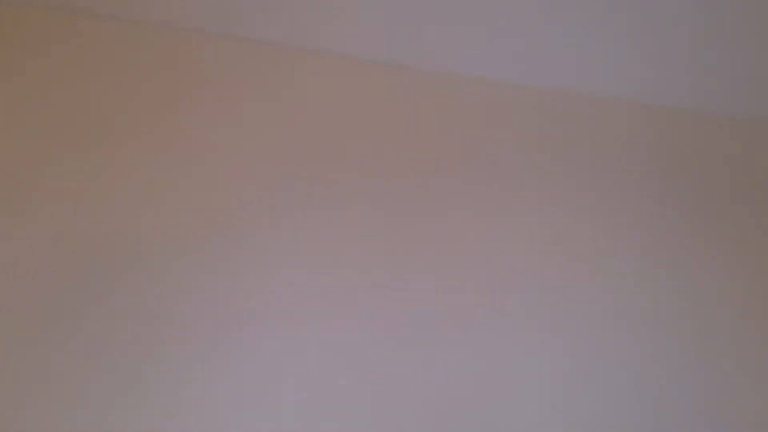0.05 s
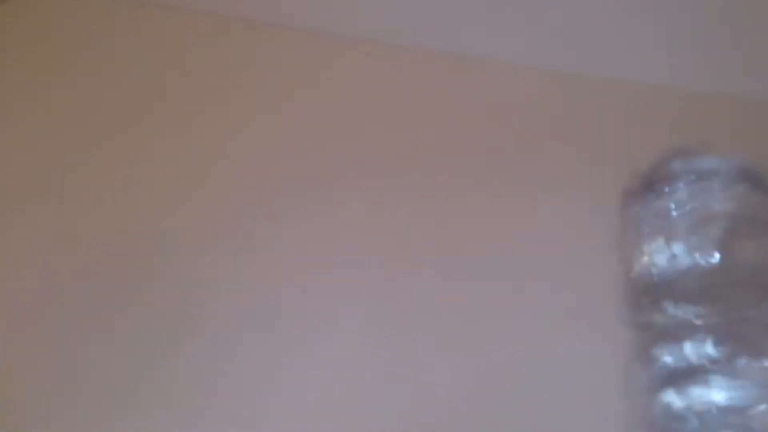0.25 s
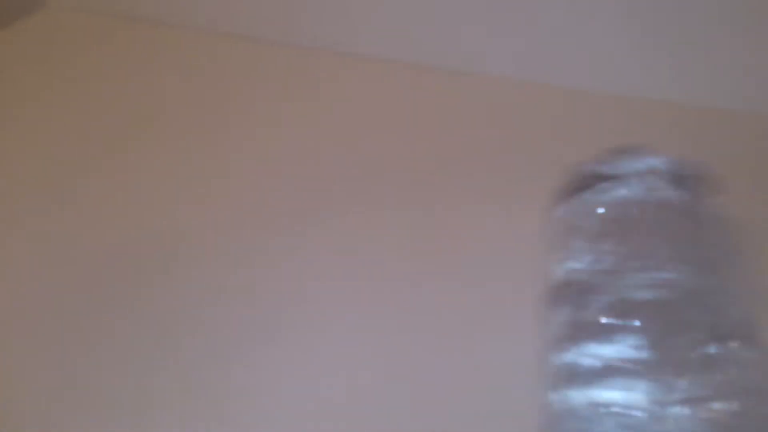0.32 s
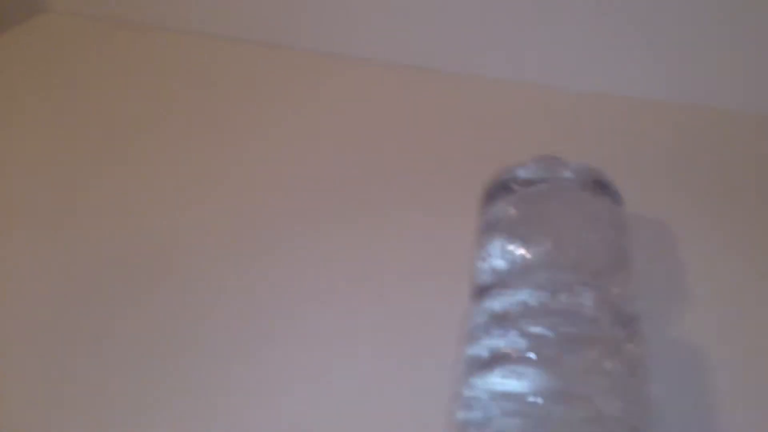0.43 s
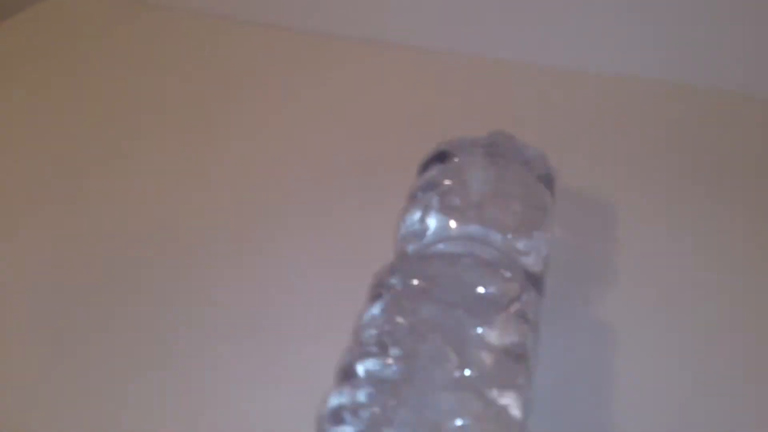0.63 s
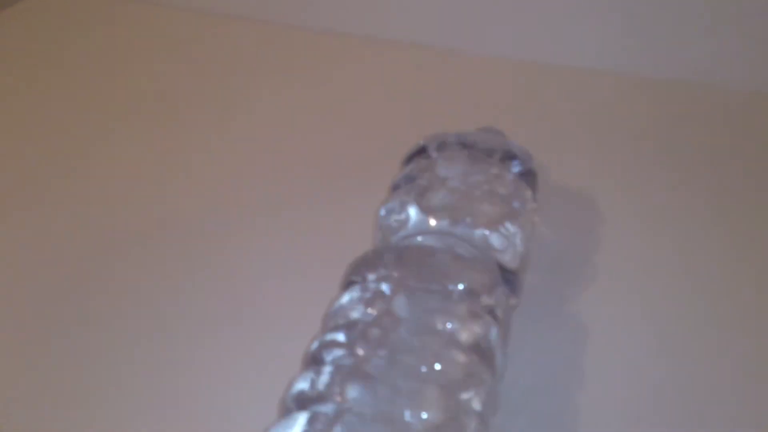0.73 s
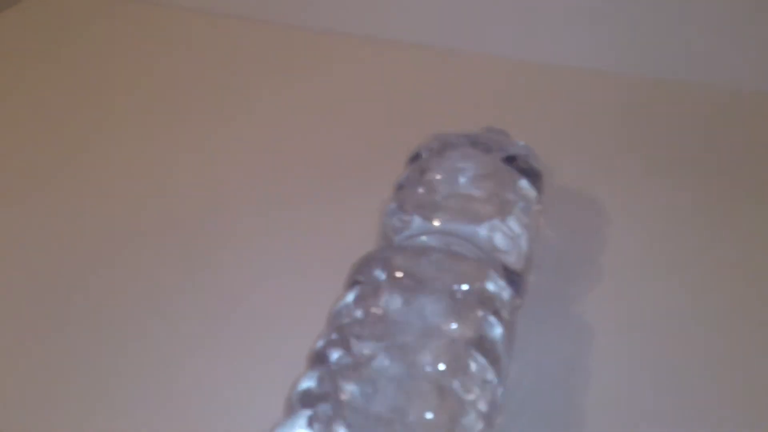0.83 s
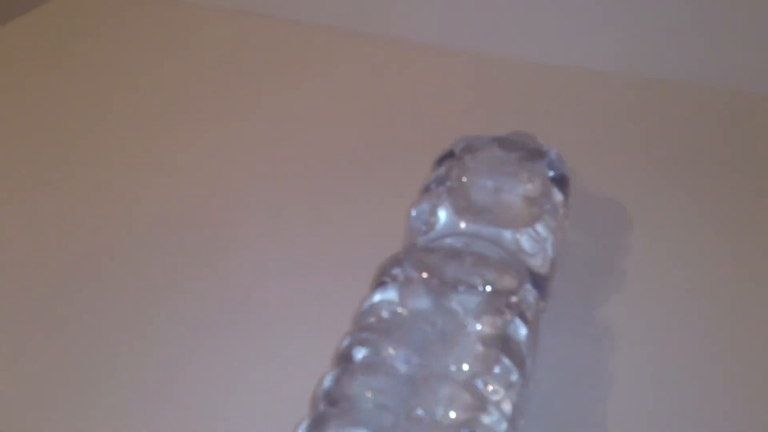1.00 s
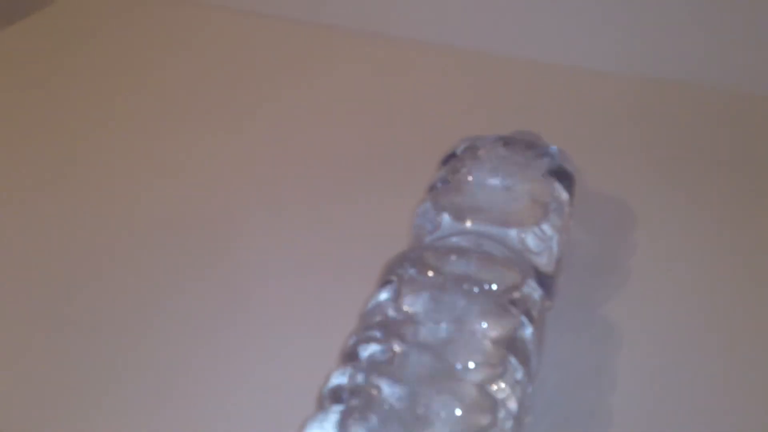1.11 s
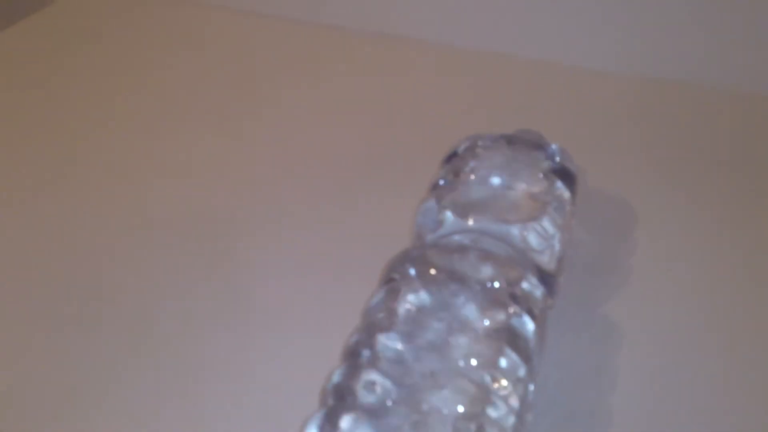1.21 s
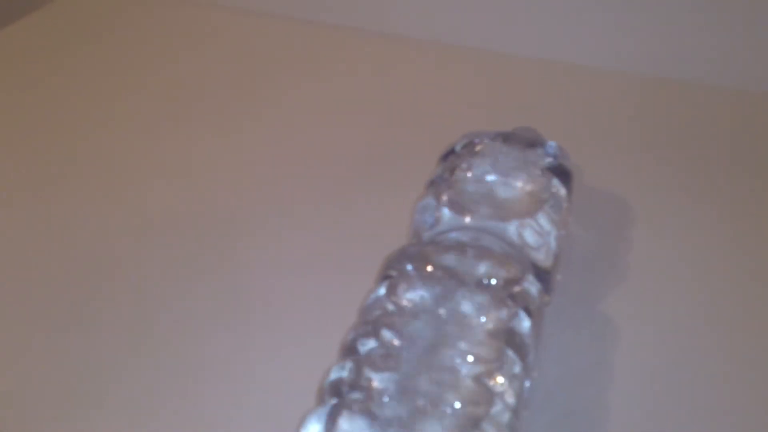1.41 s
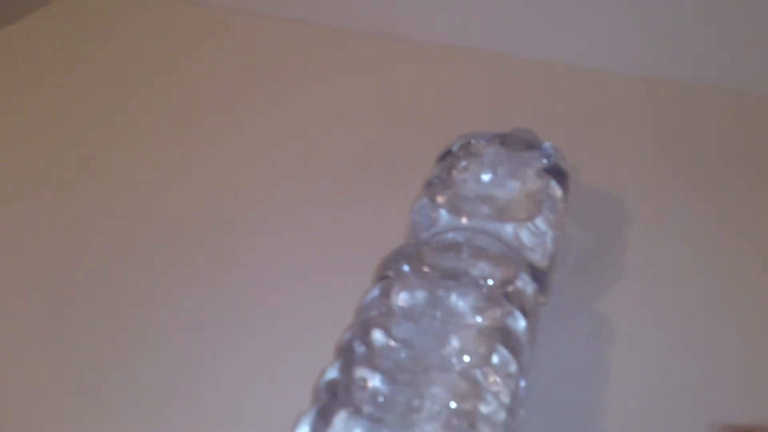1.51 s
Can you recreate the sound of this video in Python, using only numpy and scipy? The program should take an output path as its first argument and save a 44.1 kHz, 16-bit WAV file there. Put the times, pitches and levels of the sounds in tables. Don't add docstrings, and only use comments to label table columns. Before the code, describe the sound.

A ribbed plastic bottle drops on a hollow hard panel, crackles, bounces and rolls to rest

```python
import sys
import numpy as np
from scipy import signal
from scipy.fft import rfft, irfft
from scipy.io import wavfile
from scipy.ndimage import uniform_filter1d

SR = 44100
rng = np.random.default_rng(int(sys.argv[2]) if len(sys.argv) > 2 else 0)


def master_out(mix):
    frames = np.transpose(np.atleast_2d(mix))
    ceiling = np.clip(frames, -1, 1)
    pcm = np.round(ceiling * 32767).astype(np.int16)
    wavfile.write(sys.argv[1], SR, pcm)


def natural_amplitude(level_db):
    exponent = np.asarray(level_db, float) / 20
    return 10 ** exponent


N = 68355

# (frequency [Hz], level [dB])
HISS = [(15, -52.5), (25, -17), (99, 0.5), (260, -4.5), (290, -3.5), (497, -7.5), (948, -12), (1460, -16.5),
        (15600, -25.5)]
# (time [s], level [dB],
# frequency [Hz], decay [cycles])
TICKS = [(0.117, -53.5, 1620, 24), (0.1577, -39.5, 1500, 14), (0.1578, -41.5, 3700, 16),
         (.1695, -33.5, 1787, 28), (.185, -47, 1650, 20), (.2441, -11.5, 10600, 22), (.2439, -8, 13200, 16),
         (0.227, -15, 5260, 8), (.9068, -32, 1076, 40), (.9062, -35, 3314, 20), (.9755, -48, 3260, 30),
         (.2013, -20.5, 710, 4.8), (.2078, -17, 1920, 3.6), (.2150, -16.5, 800, 8),
         (.2250, -9.5, 1590, 9.2), (.2290, -17, 3800, 6.3), (.2325, -16, 2530, 4.8),
         (.2465, -16, 1960, 6.4), (.2730, -19.5, 900, 5), (.2810, -16.5, 664, 10),
         (.3355, -26.5, 4190, 9.1), (.3400, -7.5, 906, 7.2), (.3435, -18, 5170, 10), (.3465, -21.5, 760, 8),
         (.3575, -13, 1040, 7.4), (.3610, -19.5, 2775, 6), (.3695, -19.5, 2420, 4.7),
         (.3790, -14.5, 1500, 14), (.3900, -27, 2360, 6), (.4075, -23, 2000, 3.6), (.4360, -14.5, 4520, 16),
         (.4370, -18.5, 1314, 23), (.4500, -19.5, 478, 10), (.4630, -12.5, 3400, 14), (.4640, -25, 480, 10),
         (.4760, -18, 1080, 6.9), (.4985, -18, 2860, 6), (.5120, -32, 2200, 7.5), (.5220, -7.5, 464, 6.5),
         (.5360, -25, 3300, 17), (.5630, -22.5, 3600, 21), (.5860, -31, 3370, 18), (.5965, -20.5, 636, 10),
         (.6170, -19, 3140, 7.9), (.6210, -24, 910, 6.2), (.6790, -27.5, 598, 6), (.7840, -40, 1065, 20)]
# (time [s], level [dB], 60 dB decay [s], brightness [dB/octave], pitch [ratio])
FINGERS = [
    (0.118, -62.5, 0.021, 1.5, .92),
    (0.13, -63.5, 0.04, -0.5, 1),
    (0.1584, -49.5, 0.022, 2.5, 1.12),
    (0.1696, -43, 0.028, -3, 1.02),
    (0.174, -48.5, .03, 4, 0.89),
    (0.184, -50.5, 0.054, -1, 0.82),
]
# (frequency [Hz], width [Hz], level [dB])
FINGER_MODES = [(480, 150, -7.5), (930, 200, -8), (1760, 120, -3.5), (3700, 900, -12.5), (5700, 830, -21.5),
                (7550, 1600, -14.5), (10500, 2400, -13.5)]
# (frequency [Hz], level [dB])
ROOM_COLOUR = [(60, -7.5), (250, -2), (1000, -4), (4000, -2.5), (12000, -4)]
# (frequency [Hz], 60 dB decay [s])
ROOM_T60 = [(150, 0.3), (500, 0.64), (2000, 0.5), (6000, 0.41), (12000, 0.71)]
# (time [s], level [dB], brightness [dB/octave], 60 dB decay [s])
BLOWS = [(0.195, -50.5, -1, 0.044), (0.2001, -21.5, 0.5, 0.33), (.208, -13.5, -3, 0.056),
         (.225, -11, 0, 0.097), (0.234, -21, 3.5, 0.06), (0.246, -11, 2, 0.018), (.340, -16.5, -0.5, 0.1),
         (0.259, -23, -0.5, 0.047), (0.267, -21, 5, 0.15), (.335, -13.5, -1.5, 0.09),
         (0.347, -17, -1.5, 0.029), (.358, -14, -1.5, 0.071), (.369, -22.5, -2.5, 0.05),
         (0.428, -19.5, -1.5, 0.17), (.436, -15.5, 0, 0.054), (0.459, -22, 2, 0.093), (.498, -19, -1, 0.1),
         (.563, -30.5, 4, 0.09), (0.598, -27, 1.5, 0.012), (0.516, -26, -6.5, 0.11),
         (.7815, -39, -3, 0.084)]
# (frequency [Hz], level [dB])
CREASE_COLOUR = [(180, -45.5), (300, -11), (468, -8.5), (571, -15.5), (953, -10.5), (1220, -16),
                 (6680, -23.5), (10300, -19.5), (15500, -39.5)]
# (time [s], level [dB])
ROLL_FORCE = [(.196, -94.5), (.201, -45), (0.211, -23.5), (.3, -24.5), (0.332, -26), (.37, -18.5),
              (0.421, -20), (0.549, -23.5), (.65, -28.5), (0.751, -37), (0.852, -46.5), (.95, -45.5),
              (1.051, -53.5), (1.15, -65), (1.3, -83.5)]
# (frequency [Hz], width [Hz], level [dB])
PANEL = [(62, 18, -3.5), (85, 3, 2.5), (118.8, 14, -1), (180, 36, -0.5), (261.6, 6.7, -4.5), (280, 4.7, -1),
         (345, 120, -11), (494, 20, -12), (625, 48, -15.5), (800, 80, -25)]
# (frequency [Hz], width [Hz], level [dB])
SHELL = [(1055, 59, -4), (1600, 110, -30.5), (2135, 70, -5.5), (3014, 27, -14.5), (3230, 48, -11),
         (3563, 100, -7.5), (4220, 70, -21.5), (4980, 250, -23), (5500, 50, -23.5), (7400, 230, -35.5),
         (7820, 170, -30), (8800, 300, -23.5)]
# (time [s],
# level [dB], frequency [Hz], 60 dB decay [s])
THUDS = [(0.2001, -18.5, 410, 0.041), (.208, -19, 483.4, 0.16), (0.21, -6.5, 178, 0.021),
         (0.224, -5.5, 93, 0.1), (0.236, -11.5, 128, 0.038), (0.269, -18, 495.4, 0.058),
         (0.275, -20, 104, 0.077), (.338, -10, 277.8, 0.043), (0.341, -17.5, 458.8, .1),
         (0.353, -9, 106, 0.15), (0.369, -11.5, 280, 0.11), (0.432, -10, 182, 0.062),
         (.445, -22, 280, 0.19), (.478, -17.5, 280, 0.14), (.70, -29.5, 180, 0.11),
         (0.446, -8, 103.8, 0.17), (0.488, -14, 171, 0.17), (0.504, -18.5, 85.5, 0.21),
         (0.515, -15, 281, 0.096), (0.564, -40, 78, 0.077), (0.597, -15.5, 326, 0.023),
         (0.687, -20, 110.7, 0.047), (.770, -25, 305, 0.038), (0.777, -27, 187, 0.058),
         (0.829, -35.5, 180, 0.075), (.848, -37, 246, 0.076), (0.799, -39.5, 316, .12),
         (.915, -47, 304.5, 0.09), (0.8821, -41, 176.7, 0.31), (0.937, -55, 176.3, 0.14),
         (0.798, -35, 87.5, 0.13), (.885, -38, 80.2, 0.087), (0.729, -27, 180, .08), (.61, -33, 345, 0.43),
         (1.05, -65, 68, 0.21), (1.17, -60, 59.8, 0.18)]
# (time [s], lowest shell mode level [dB], upper modes and click level [dB])
ROCKS = [(.462, -37.5, -26.5), (0.534, -37, -27.5), (.563, -28, -24.5), (.588, -57, -29.5),
         (.617, -37.5, -26), (.653, -29.5, -51), (.680, -38, -37.5), (0.713, -33, -48),
         (.732, -42.5, -41.5), (0.761, -39, -44), (0.78, -40, -41), (0.816, -54, -48.5),
         (0.9059, -32, -38.5), (0.975, -47, -45.5), (0.999, -52, -51.5)]
# (frequency [Hz], width [Hz], level [dB])
KNOCK = [(1065, 140, 0)]
# (frequency [Hz], width [Hz], level [dB])
CLACK = [(2150, 620, 2.5), (3270, 1100, -1), (5400, 610, -6.5), (7850, 630, -9)]
# (frequency [Hz], level [dB])
MICROPHONE = [(4000, 1), (8000, -4.5), (10600, -6), (12500, -13.5), (14300, -13), (15700, -27.5)]


def evened(x):
    return x / np.sqrt(np.mean(x ** 2) + 1e-20)


def read(points, hz):
    f, value = np.transpose(points)
    return np.interp(np.log(hz + 1), np.log(f + 1), value)


def add(mix, s, sound):
    part = mix[round(s * SR):][:len(sound)]
    part += sound[:len(part)]


def colour(x, points, tilt_db=0.):
    hz = np.fft.rfftfreq(len(x), 1 / SR)
    gain_db = read(points, hz) + tilt_db * np.log2((hz + 50) / 3000)
    return irfft(rfft(x) * natural_amplitude(gain_db), len(x))


def ring(x, modes):
    out = np.zeros(len(x))
    for k, (hz, width, db) in enumerate(modes):
        b, a = signal.iirpeak(hz, hz / width, SR)
        out += (-1) ** k * natural_amplitude(db) * signal.lfilter(b, a, x)
    return out


def burst(t60, rise_s, noise):
    t = np.arange(len(noise)) / SR
    return noise * np.minimum(t / rise_s, 1) * natural_amplitude(-60 * t / t60)


def floor():
    t = np.arange(N) / SR
    stir = evened(ring(rng.standard_normal(N), [(410, 44, 2), (1500, 320, -9.0)]))
    fade = 1 / (1 + (t / 0.23) ** 4)
    hiss = evened(colour(rng.standard_normal(N), HISS))
    return natural_amplitude(-63.5) * hiss + natural_amplitude(-70.5) * stir * fade


def ticks():
    out, t = np.zeros(N), np.arange(2048) / SR
    for s, db, hz, cycles in TICKS:
        envelope = natural_amplitude(db - 60 * t * hz / cycles) * np.minimum(t * hz, 1)
        add(out, s, -envelope * np.sin(2 * np.pi * hz * t))
    return out


def fingertips():
    out = np.zeros(N)
    for s, db, t60, tilt_db, pitch in FINGERS:
        noise = colour(rng.standard_normal(8192), [(100, 0.022), (200, 0)], tilt_db)
        push = burst(t60, 0.0006, noise)
        for hz, width, mode_db in FINGER_MODES:
            narrow = ring(push, [(hz * pitch, width, mode_db)])
            add(out, s, natural_amplitude(db + 23.5) * ring(narrow, [(hz * pitch, 3 * width, 0)]))
    return out


def room(x):
    taps, gap = np.zeros(SR // 2), 22
    at = np.arange(200, len(taps) - gap, gap)
    taps[at + rng.integers(0, gap, len(at))] = rng.choice([-1., 1.], len(at))
    hz, t, bands = signal.stft(taps, SR, nperseg=256)
    decay_db = read(ROOM_COLOUR, hz)[:, None] - 60 * t / read(ROOM_T60, hz)[:, None]
    tail = signal.istft(bands * natural_amplitude(decay_db), SR, nperseg=256)[1]
    return signal.fftconvolve(x, tail / np.linalg.norm(tail))[:N]


def blows():
    out = np.zeros(N)
    for s, db, tilt_db, t60 in BLOWS:
        noise, wander = rng.standard_normal((2, 4096))
        grain = noise * natural_amplitude(2.4 * evened(uniform_filter1d(wander, size=20)))
        crackle = evened(colour(grain, CREASE_COLOUR, tilt_db))
        add(out, s, natural_amplitude(db) * burst(t60, 0.02 * t60, crackle))
    return out


def roll():
    force_db = np.interp(np.arange(N) / SR, *np.transpose(ROLL_FORCE))
    ribs_per_s, spread_db = 900, 2.5
    strength = natural_amplitude(spread_db * np.minimum(rng.exponential(1, N), 3))
    size = strength * (rng.random(N) < ribs_per_s / SR)
    ribs = evened(size * rng.choice([-1., 1.], N)) + 0.5 * rng.standard_normal(N)
    flutter = evened(signal.lfilter([1], [1, -0.99], size) + 18.0)
    patter = flutter * rng.standard_normal(N)
    rumble = ring(ribs * natural_amplitude(-6.5 + 1.08 * (force_db + 26.5)), PANEL)
    shell = ring(patter * natural_amplitude(-25.5 + 0.71 * (force_db + 23.5)), SHELL)
    fizz = evened(colour(patter, CREASE_COLOUR, -1.9)) * natural_amplitude(-34.5 + 1.31 * (force_db + 26))
    return rumble + shell + fizz


def thuds():
    out, t = np.zeros(N), np.arange(SR // 2) / SR
    hold = 1.3
    for s, db, hz, t60 in THUDS:
        envelope = natural_amplitude(db - 60 * (t / t60) ** hold) * (1 - np.exp(-t * hz * 3))
        add(out, s, -envelope * np.sin(2 * np.pi * hz * t))
    return out


def crease_pop():
    out = np.zeros(N)
    snap = burst(0.013, 0.000067, rng.standard_normal(8192))
    snap[0] += 1.6
    add(out, 0.2437, natural_amplitude(5) * snap)
    pop = [(11200, 6000, 0)]
    return ring(ring(out, pop), pop)


def rocks():
    low, high, sharp = np.zeros((3, N))
    t = np.arange(8192) / SR
    tone = np.sin(2 * np.pi * KNOCK[0][0] * t)
    rise_s, rattle_t60 = 0.0006, 0.24
    for s, low_db, high_db in ROCKS:
        noise = rng.standard_normal(8192)
        rattle = burst(rattle_t60, rise_s, noise)
        knock = burst(0.04, 0.0011, 0.76 * noise + 0.44 * tone)
        chatter = burst(0.035, rise_s, noise) + natural_amplitude(-3) * rattle
        click = burst(0.045, rise_s / 2, noise) + natural_amplitude(-9.5) * rattle
        add(low, s, natural_amplitude(low_db + 11) * knock)
        add(high, s, natural_amplitude(high_db + 14.5) * chatter)
        add(sharp, s, natural_amplitude(high_db + 17.5) * click)
    return ring(low, KNOCK) + ring(high, SHELL[1:]) + natural_amplitude(-15.5) * ring(sharp, CLACK)


def scene():
    near = thuds() + ticks() + blows() + rocks() + fingertips() + crease_pop() + roll()
    heard = colour(near + natural_amplitude(-7.5) * room(near), MICROPHONE)
    return (heard + floor())[None]


def low_pass(x):
    return signal.sosfilt(signal.butter(12, 15760, fs=SR, output="sos"), x)


def record(dry):
    ceiling = 1.3
    rounded = ceiling * np.tanh(dry / ceiling)
    edge = signal.ellip(10, 0.5, 70, 15700, fs=SR, output="sos")
    bass_cut = signal.butter(2, 42, "high", fs=SR, output="sos")
    mix = signal.sosfilt(np.vstack([edge, bass_cut]), rounded)
    return low_pass(mix)


dry = scene()
out = record(dry)
master_out(out)
```